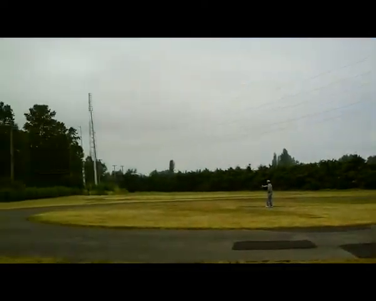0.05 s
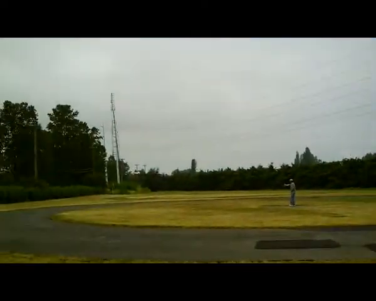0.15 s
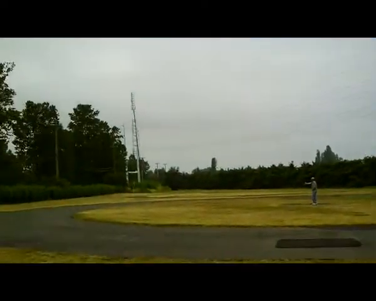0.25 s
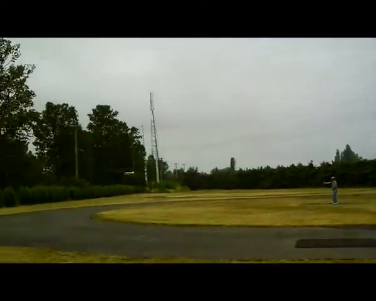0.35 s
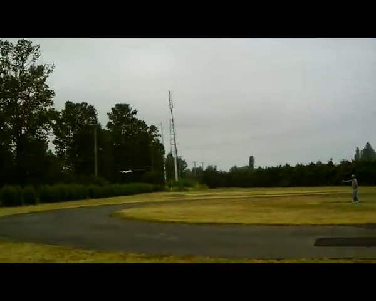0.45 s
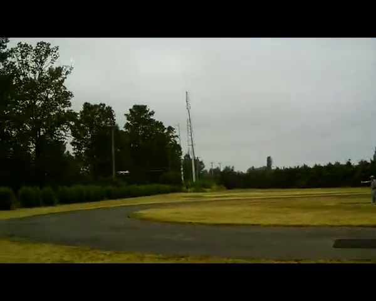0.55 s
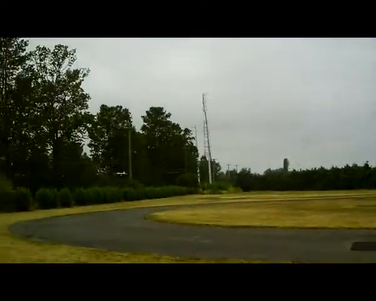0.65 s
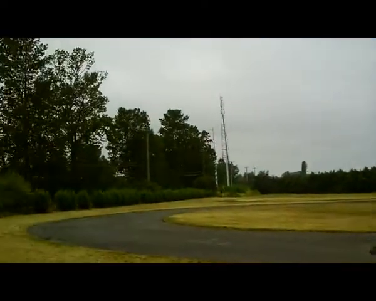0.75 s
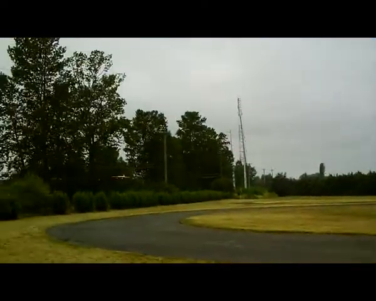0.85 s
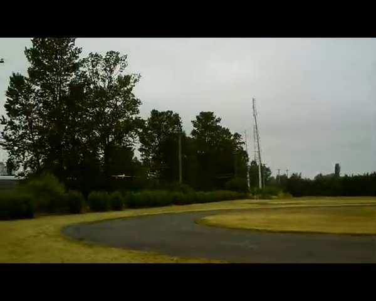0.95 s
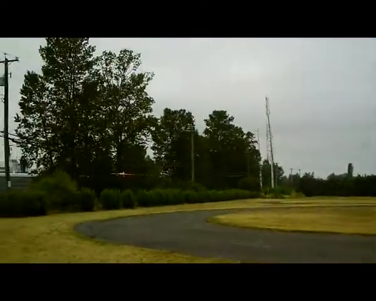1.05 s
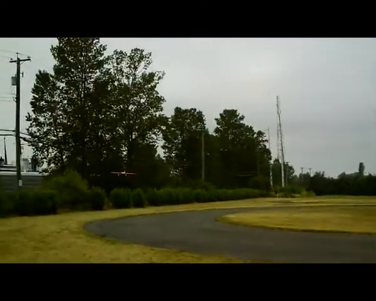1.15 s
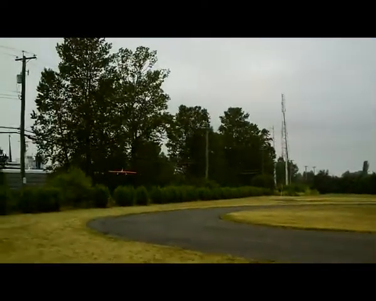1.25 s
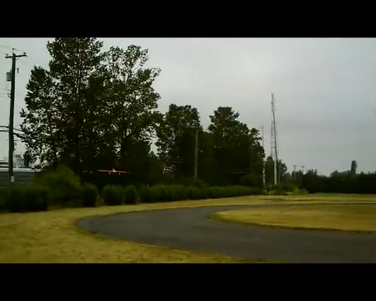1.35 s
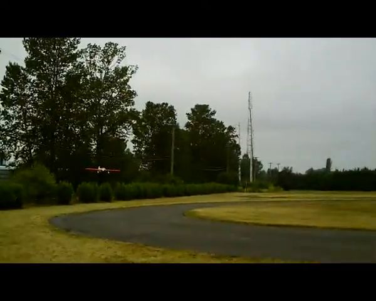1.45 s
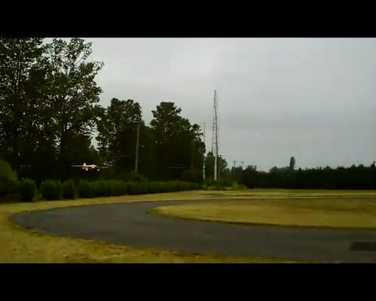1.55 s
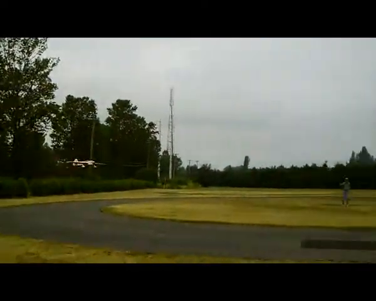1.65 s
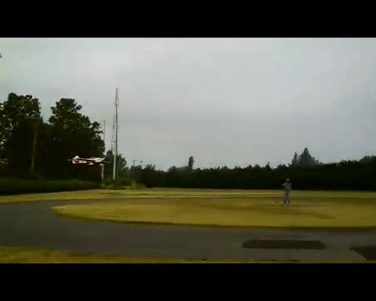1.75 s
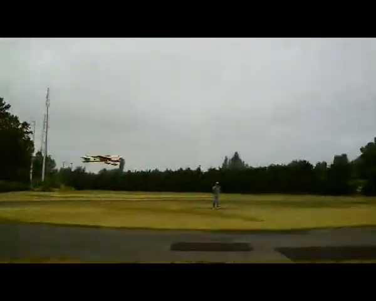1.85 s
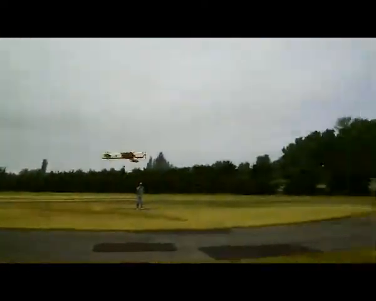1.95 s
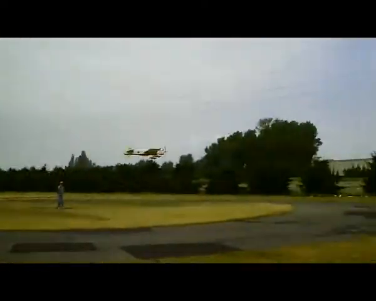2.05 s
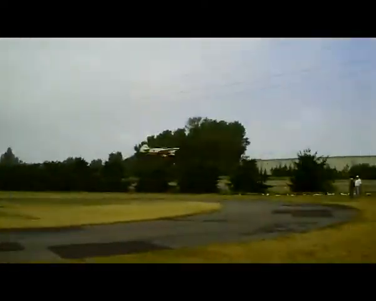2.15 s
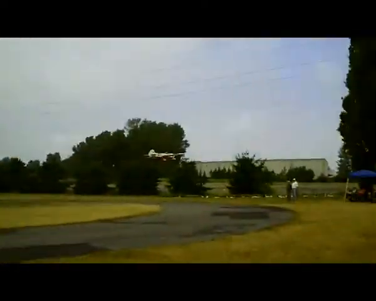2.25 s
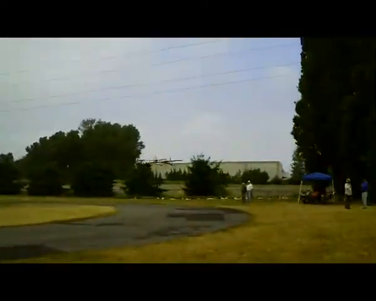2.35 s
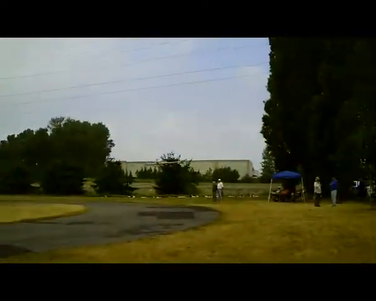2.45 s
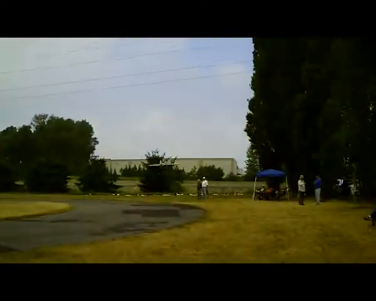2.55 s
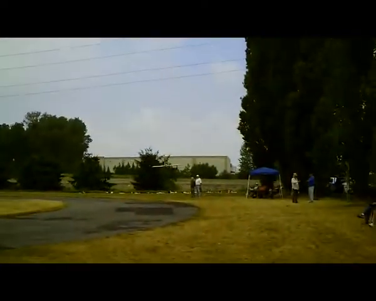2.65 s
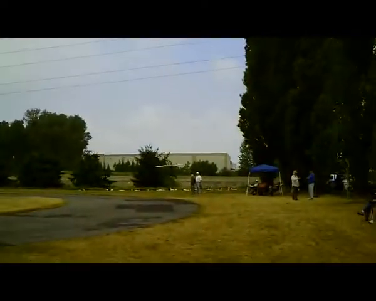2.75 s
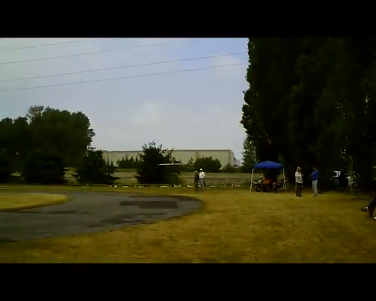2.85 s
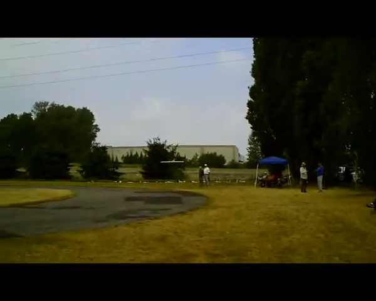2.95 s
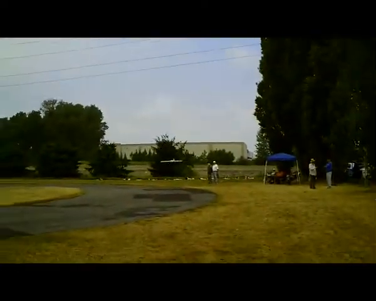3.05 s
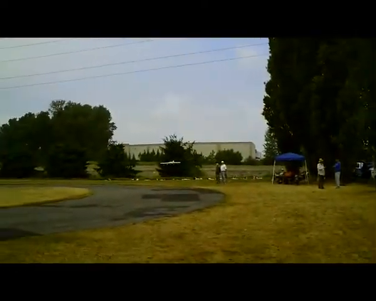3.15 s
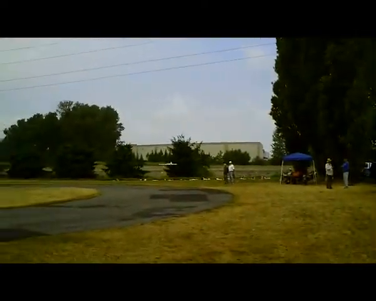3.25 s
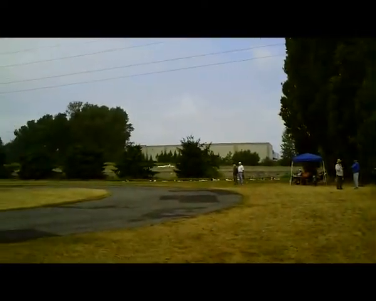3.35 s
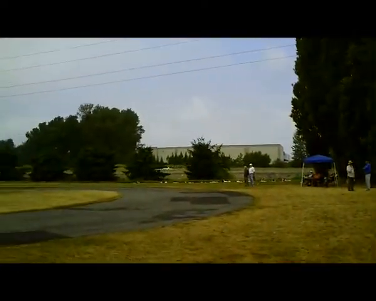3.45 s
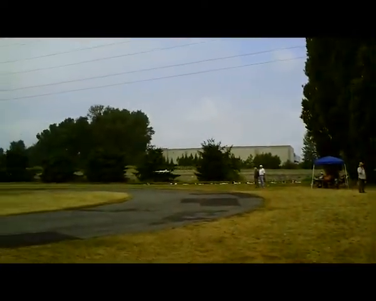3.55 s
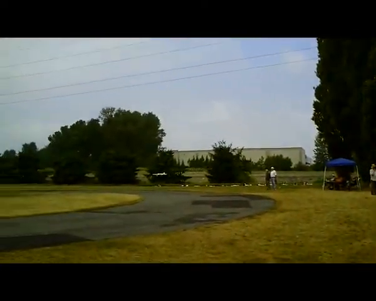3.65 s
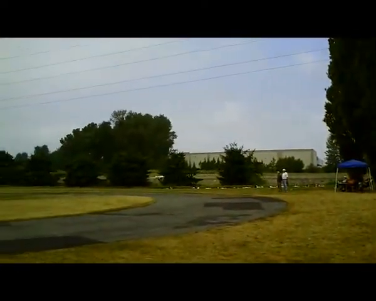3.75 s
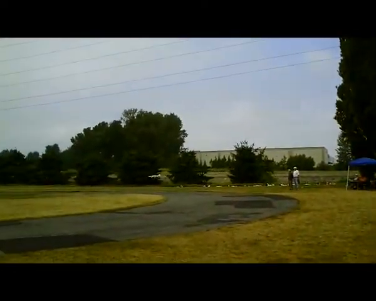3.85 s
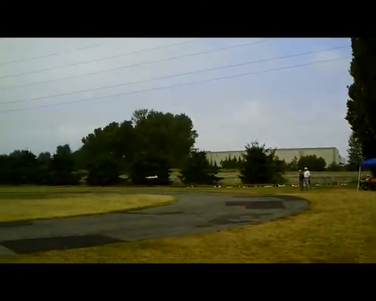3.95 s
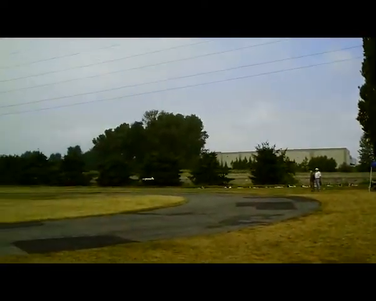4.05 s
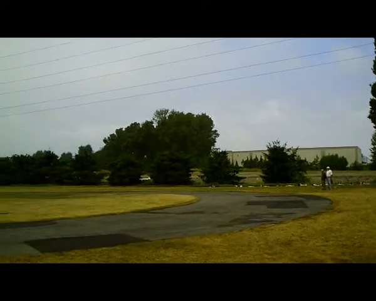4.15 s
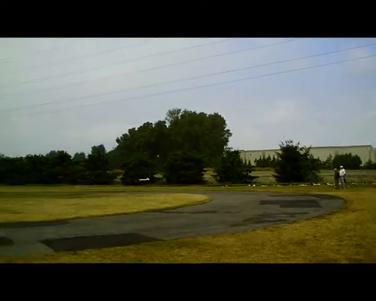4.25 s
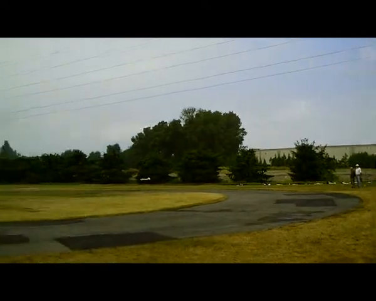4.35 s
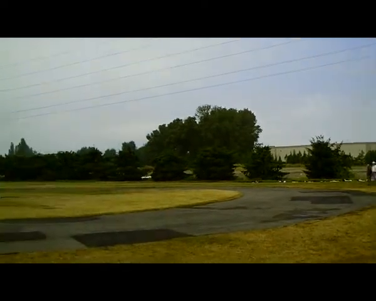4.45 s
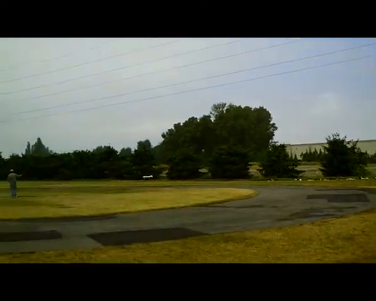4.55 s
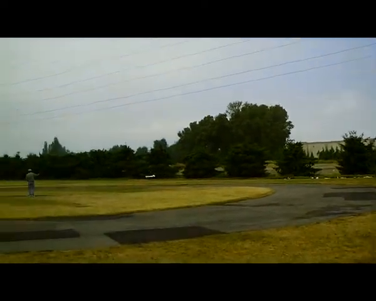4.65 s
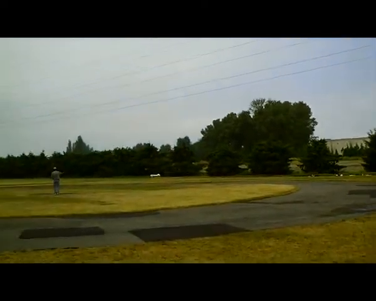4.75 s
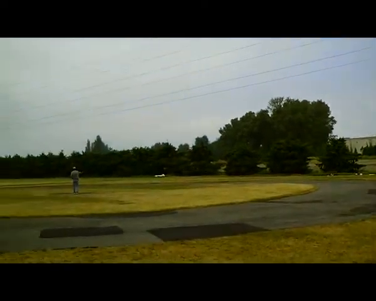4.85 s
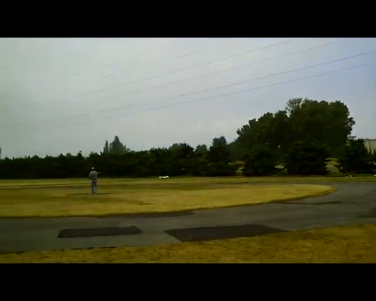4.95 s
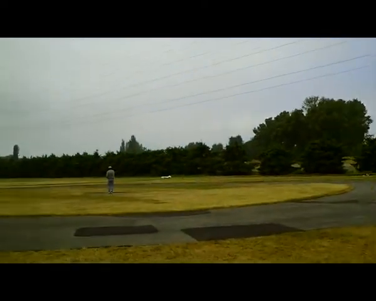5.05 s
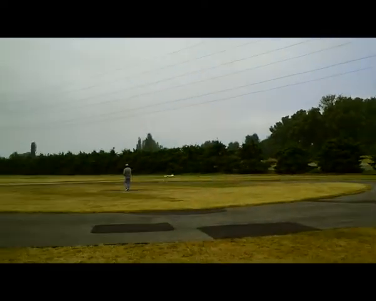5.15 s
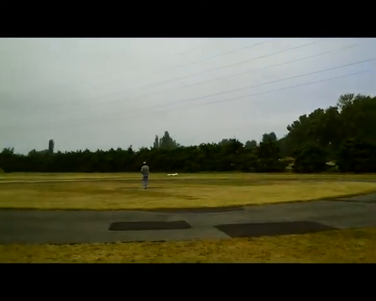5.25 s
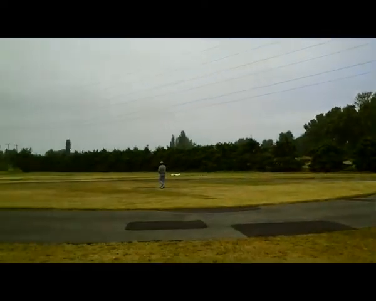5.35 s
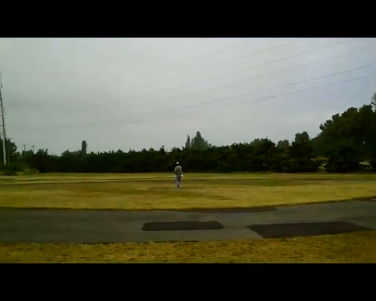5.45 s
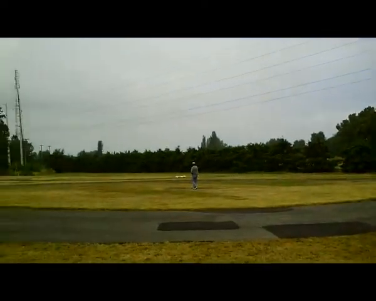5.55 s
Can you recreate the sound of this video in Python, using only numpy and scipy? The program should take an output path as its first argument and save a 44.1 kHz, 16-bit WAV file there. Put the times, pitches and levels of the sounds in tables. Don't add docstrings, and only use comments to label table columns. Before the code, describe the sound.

Open grass field with a low, steady rumble of distant traffic and wind. From 0 s a small four-stroke model plane approaches: a firm, nasal, raspy buzz around 80 pulses a second, with metallic clatter and bright propeller hiss. It edges up in pitch and swells, its timbre shifting as it turns, loudest around 1.5-1.8 s. At about 1.76 s the engine cuts at its nearest point; pitch falls quickly, with hollow barks and small stumbles, becoming a slowing putter near 40 a second by 2.7 s. It recedes and fades out around 3-3.4 s. A faint hollow blade tone and breathy air puffs linger to about 4.3 s. Small high chirps cluster at 3.2-3.8 s and again at 4.8-5.2 s. Fine metallic valve ticks, clearest at 4.3-4.8 s, gradually slow and vanish, leaving quiet rumble until 5.6 s. Faint echoes return from the hedge.

```python
import sys
import numpy as np
from scipy import signal
from scipy.fft import rfft, irfft
from scipy.io import wavfile
from scipy.ndimage import uniform_filter1d

SR = 44100
rng = np.random.default_rng(int(sys.argv[2]) if len(sys.argv) > 2 else 0)


def boost(x):
    u = np.asarray(x, float) / 20
    return 10 ** u


def waveform_to_disk(signal):
    frames = np.transpose(np.atleast_2d(signal))
    scaled = np.clip(frames, -1, 1) * 32767
    samples = np.round(scaled).astype(np.int16)
    wavfile.write(sys.argv[1], SR, samples)


N = 246959
FIRE_OUT_S, FIRE_FADE_S = 3.15, 0.3

# [t/s, engine cycles/s]
SPEED = [(0.0, 78.2), (0.33, 80.1), (0.79, 82.2), (1.18, 84.0), (1.58, 83.0), (1.68, 80.6), (1.735, 79.0),
         (1.765, 74.9), (1.8, 73.2), (2.01, 63.6), (2.1, 57.9), (2.32, 48.3), (2.43, 44.3), (2.66, 40.5),
         (2.95, 36.0), (5.6, 12.3)]
# [t/s, level/dB]
NEARNESS = [(0, -51), (.36, -50.5), (.85, -43.5), (1.06, -44.5), (1.51, -40), (1.8, -37.5), (2.01, -41.5),
            (2.3, -47.5), (2.55, -51), (2.9, -56.5), (3.3, -59.5), (3.98, -69), (4.4, -65), (4.95, -72.5),
            (5.6, -83)]
# [f/Hz, density/dB per Hz]
HISS = [(1650, -14.5), (2700, -2.5), (3240, -6.5), (4600, -6), (5770, -3.5), (7440, -2), (10200, -11.5),
        (11400, -20.5), (12200, -7), (13000, -12), (13700, -11.5), (14600, -17.5), (16000, -35)]


def rms_one(x):
    return x / np.sqrt(np.mean(x ** 2) + 1e-20)


def in_time(rows):
    s, *columns = np.transpose(rows)
    return [np.interp(np.arange(N) / SR, s, c) for c in columns]


def evened(x):
    return x / np.sqrt(uniform_filter1d(x ** 2, size=6000) + 1e-12)


def drift(rate_hz):
    knots_per_s = 60
    knots = rng.standard_normal(int(N / SR * knots_per_s) + 2)
    pole = np.exp(-2 * np.pi * min(rate_hz, 25) / knots_per_s)
    smooth = rms_one(signal.lfilter([1], [1, -pole], knots))
    return np.interp(np.arange(N) / SR * knots_per_s, np.arange(len(knots)), smooth)


def coloured(spectrum):
    hz, level_db = np.transpose(spectrum)
    grid_hz = np.arange(N // 2 + 1) * SR / N + 1
    gain = boost(np.interp(np.log(grid_hz), np.log(hz), level_db))
    return rms_one(irfft(rfft(rng.standard_normal(N)) * gain, N))


def resonate(x, modes):
    out = 0
    for hz, width_hz, level_db in modes:
        r = np.exp(-np.pi * width_hz / SR)
        poles = [1, -2 * r * np.cos(2 * np.pi * hz / SR), r * r]
        out = out + boost(level_db) * signal.lfilter([(1 - r * r) / 2, 0, (r * r - 1) / 2], poles, x)
    return out


def steep(x, hz, width_hz):
    return resonate(resonate(x, [(hz, width_hz, 0)]), [(hz, width_hz, 0)])


def pipe(x, modes, facing_db):
    return evened(sum(boost(level_db + side * facing_db) * steep(x, hz, width_hz)
                      for hz, width_hz, level_db, side in modes))


def window(start_s, end_s, edge_s):
    t = np.arange(N) / SR
    return np.clip(np.minimum(t - start_s, end_s - t) / edge_s + .5, 0, 1)


def facing(at_s, for_s):
    return np.exp(-((np.arange(N) / SR - at_s) / for_s) ** 2)


def fire():
    return np.clip(1 - (np.arange(N) / SR - FIRE_OUT_S) / FIRE_FADE_S, 0, 1)


def cycles(per_s, at_s):
    turns = np.cumsum(per_s) / SR
    return turns - turns[int(at_s * SR)] + 400


def clicks(turns, spread_db):
    whole = np.floor(turns).astype(int)
    strength = boost(spread_db * rng.standard_normal(800))
    return (np.diff(whole, prepend=whole[0]) > 0) * strength[whole]


def stroke(noisy, beats, flow):
    return np.sqrt(1 - noisy) * beats + np.sqrt(noisy) * flow


def field():
    # [f/Hz, density/dB per Hz]
    rumble = [(15, -49), (25, -1.5), (110, -4.5), (150, -11.5), (230, -15.5), (290, -23), (550, -26),
              (800, -17), (1050, -20.5), (1250, -26), (2500, -29.5), (2850, -42.5), (7700, -47.5),
              (12000, -69)]
    whine = rms_one(steep(rng.standard_normal(N), 7590, 60))
    return boost(-40.5 + 0.28 * drift(0.69)) * coloured(rumble) + boost(-81) * whine


def birds():
    # [t/s, start f/Hz, level/dB]
    chirps_up = [
        (3.235, 6940, -65),
        (3.355, 6830, -57),
        (3.485, 7000, -60),
        (3.59, 7300, -61),
        (3.71, 6900, -66),
        (4.81, 7000, -61),
    ]
    # [t/s, length/s, f/Hz, level/dB]
    twitter = [(3.402, 0.033, 7170, -59), (4.927, 0.022, 7700, -65), (5.0, 0.027, 6260, -62),
               (5.023, 0.03, 6830, -57), (5.055, .018, 6620, -57), (5.112, 0.011, 6950, -64),
               (5.133, 0.028, 5430, -64), (5.183, 0.031, 5420, -62), (5.13, .012, 5200, -65),
               (5.045, .015, 5320, -64), (3.442, .025, 7130, -59), (3.6, 0.0123, 7100, -58),
               (3.325, .015, 7000, -57)]
    up_s, up_hz = .041, 697
    out = np.zeros(N)
    notes = [(s, up_s, hz, hz + up_hz, level_db) for s, hz, level_db in chirps_up]
    notes += [(s, length_s, hz, hz, level_db) for s, length_s, hz, level_db in twitter]
    for s, length_s, start_hz, end_hz, level_db in notes:
        t = np.arange(int(length_s * SR)) / SR
        pitch_hz = start_hz + (end_hz - start_hz) * t / length_s + 70.0 * np.sin(2 * np.pi * 83.0 * t)
        note = np.hanning(len(t)) ** .5 * np.sin(2 * np.pi * np.cumsum(pitch_hz) / SR)
        out[int(s * SR):int(s * SR) + len(t)] += boost(level_db) * note
    echoes = [(0.011, 0.48), (0.027, 0.3), (0.059, 0.25)]   # (lag s, gain)
    return out + sum(gain * np.roll(out, int(lag_s * SR)) for lag_s, gain in echoes)


def blade_tone():
    speed = in_time(SPEED)[0]
    turns = cycles(speed, 4.5275)
    fuselage_hz, width_hz, level_db = 286, 40, -55
    tone = 0
    for k in range(7, 13):
        passing = np.exp(-((k * speed - fuselage_hz) / width_hz) ** 2)
        tone = tone + boost(level_db + 1.7 * drift(3.6)) * passing * np.sin(2 * np.pi * k * turns)
    return window(2.82, 3.92, 0.15) * tone


def wing_gusts():
    # [f/Hz, width/Hz, level/dB, at t/s, for/s]
    gusts = [
        (1490, 190, -58, 3.95, .06),
        (2960, 390, -65.5, 4.25, 0.11),
        (2200, 770, -64.5, 3.7, 0.092),
        (3970, 2300, -60, 3.0, 0.17),
    ]
    air = rng.standard_normal(N)
    return sum(boost(level_db) * facing(at_s, for_s) * rms_one(resonate(air, [(hz, width_hz, 0)]))
               for hz, width_hz, level_db, at_s, for_s in gusts)


def tappet(turns):
    # [level/dB, facing at t/s, for/s]
    tappet_heard = [
        (-58, 3.68, .12),
        (-61, 3.6, .03),
        (-61, 4.41, .08),
    ]
    level = sum(boost(level_db) * facing(at_s, for_s) for level_db, at_s, for_s in tappet_heard)
    knock = np.diff(np.floor(turns), prepend=turns[0] // 1)
    return level * 70 * resonate(knock, [(5430, 200, 0)])


def valve_ticks(turns):
    # [share of cycle, level/dB]
    valves = [
        (0.0, 0.5),
        (.27, -1.5),
        (.52, -14),
        (.76, -17),
    ]
    # [f/Hz, width/Hz, level/dB]
    valve_gear = [(4200, 300, 10), (5890, 620, 6), (6550, 900, 0), (7270, 770, -8), (8250, 770, -9)]
    # [t/s, peak level/dB]
    ticks = [(4.3097, -52), (4.3516, -49), (4.394, -46), (4.4374, -46), (4.4793, -53), (4.5277, -47),
             (4.5736, -49), (4.621, -46.5), (4.6699, -49), (4.7198, -48.5), (4.771, -46.5), (4.818, -53)]
    t, side_on_s, side_off_s = np.arange(N) / SR, 4.28, 4.83
    tick_db = -60 - 12 * window(side_on_s, side_off_s, .15) - 45 * np.maximum(t - side_off_s, 0)
    single = np.zeros(N)
    tick_s, peak_db = np.transpose(ticks)
    single[(tick_s * SR).astype(int)] = boost(peak_db - 7.0)
    single = single + boost(-4.5) * np.roll(single, int(.012 * SR))
    single = signal.lfilter([1], [1, -.99], single)
    contacts = sum(boost(level_db) * clicks(turns - share, spread_db=1.2) for share, level_db in valves)
    burst = signal.lfilter([1], [1, -.985], contacts)
    metal = rms_one(resonate(rng.standard_normal(N), valve_gear)) + 1.27 * coloured(HISS)
    bright = signal.sosfilt(signal.butter(4, 5000, "high", fs=SR, output="sos"), metal)
    return boost(tick_db) * burst * metal + single * bright


def glide():
    air_db, turns = in_time(NEARNESS)[0], cycles(in_time(SPEED)[0], 4.5275)
    airflow = boost(air_db + 1.0 * drift(6.9)) * coloured(HISS)
    fire_out = np.sqrt(1 - fire() ** 2)
    return tappet(turns) + fire_out * (valve_ticks(turns) + airflow) + blade_tone() + wing_gusts()


def air_hiss(turns, later):
    # [f/Hz, width/Hz, level/dB, facing at t/s, for/s]
    panels = [(6100, 400, 3.5, 0.23, 0.37), (7960, 830, -3.5, .1, 0.33), (6420, 390, 7.5, 0.73, 0.28),
              (6900, 130, 3, 0.63, 0.093), (4125, 270, 0, 0.71, 1), (5960, 220, -3, 0.89, 0.18),
              (7160, 410, 2, 0.96, 0.57), (6510, 340, 0, 1.66, 0.55), (8440, 370, 0, 1.6, 1),
              (9300, 620, -5.5, 1.9, 0.74), (7550, 170, 3, 1.75, 0.31), (5940, 270, 0.5, 1.96, 0.16),
              (6250, 420, 3.5, 2.16, .15), (7100, 230, -3.5, 1.8, 0.69)]
    puff_at, second_puff_at = .09, 0.31
    puffs = (1 - 0.52 * later) * np.exp(-4.0 * ((turns - puff_at) % 1))
    puffs = puffs + 0.41 * later * np.exp(-4.0 * ((turns - second_puff_at) % 1))
    luck = rng.standard_normal(800)
    swell = 0.82 + puffs * boost(1.8 * luck)[(turns - puff_at).astype(int)]
    stall = np.exp(-((turns % 1 - 0.884) / 0.067) ** 2)
    lull = boost(-6.5 * np.abs(luck[::-1])[turns.astype(int)] * stall)
    knocks = swell ** 2.4 * rng.standard_normal(N)
    clatter = rms_one(sum(facing(at_s, for_s) * resonate(knocks, [mode]) for *mode, at_s, for_s in panels))
    hiss = rms_one(swell * coloured(HISS)) + 0.52 * boost(1.0 * drift(4.6)) * clatter
    hiss = evened(lull * hiss) * boost(0.95 * drift(16.0))
    top = signal.sosfiltfilt(signal.butter(4, 11300, "high", fs=SR, output="sos"), hiss)
    return hiss - .35 * window(2.3, 9, 0.55) * top


def intake(turns, noisy, later, later_at):
    # [f/Hz, width/Hz, level/dB, side it faces]
    throat = [
        (2138, 195, 1, 0),
        (2284, 285, 3.5, 0),
    ]
    first_at = 0.1004
    gulps = np.sqrt(1 - later) * evened(clicks(turns - first_at, spread_db=1.5))
    gulps = gulps + np.sqrt(later) * evened(clicks(turns - later_at, spread_db=-1.5))
    flow = 0.4 + (1 - later) * np.exp(-6.0 * ((turns - first_at) % 1))
    flow = flow + later * np.exp(-6.0 * ((turns - later_at + 0.11) % 1))
    suck = evened(flow * rng.standard_normal(N))
    return pipe(stroke(noisy, gulps, suck), throat, 0)


def cowl_openings(clean):
    # [f/Hz, width/Hz, level/dB, facing at t/s, for/s]
    cowl = [(497, 69, -52.5, 0.65, 0.28), (606, 59, -50, 0.9, 0.24), (1410, 81, -49, 1.12, 0.16),
            (1696, 110, -47, 1.59, 0.2), (914, 66, -40, 1.9, 0.053), (1360, 250, -44.5, 1.8, 0.08),
            (1062, 125, -41.5, 1.96, 0.12), (417, 240, -73, 2.5, 0.076), (2840, 67, -64, 2.16, 0.26),
            (1350, 190, -50.5, 0.27, 0.32), (616, 92, -47, 2.125, 0.19), (322.6, 110, -47.5, 2.084, 0.17),
            (241, 50, -49.5, 1.56, 0.37), (433, 23, -47.5, 0.96, 0.19), (536, 120, -54.5, 2.49, 0.14),
            (395, 39, -51, 0.093, 0.2), (810, 68, -49, 2.7, 0.074), (800, 130, -46, 2.44, 0.063),
            (2800, 270, -57, 2.47, 0.057)]
    return sum(boost(level_db) * facing(at_s, for_s) * pipe(clean, [(hz, width_hz, 0, 0)], 0)
               for hz, width_hz, level_db, at_s, for_s in cowl)


def exhaust_thump(strokes):
    # [f/Hz, width/Hz, level/dB]
    thump_modes = [
        (150, 53, 1),
        (270.5, 84, 7.5),
        (402, 38, 6.5),
    ]
    # [t/s, lag/ms]
    ground_echo = [(0, .82), (.75, .78), (1.0, .9), (1.2, 1.0), (1.5, 1.1), (1.76, 1.75), (2.0, 2.1),
                   (2.4, 2.15), (2.7, 1.2)]
    echo_ms = in_time(ground_echo)[0]
    thump = resonate(strokes, thump_modes)
    thump = signal.sosfilt(signal.butter(3, 600, fs=SR, output="sos"), thump)
    return evened(thump + .7 * np.interp(np.arange(N) - echo_ms * SR / 1000, np.arange(N), thump))


def silencer_bark(turns, pulses, gas, noisy, facing_db):
    # [t/s, strength re pulse, lead/cycles]
    blow_down = [(0, 0.16, .3), (.6, 0.33, 0.34), (1.0, 0.59, 0.34), (1.4, 0.35, 0.32), (1.62, 0.27, 0.37),
                 (1.75, 0.66, 0.34), (1.9, 0.65, 0.364), (2.2, 2.4, 0.288), (2.42, 4.3, 0.099),
                 (3.2, 8.2, 0.097)]
    # [f/Hz, width/Hz, level/dB, side it faces]
    silencer = [
        (770, 120, 0, -1),
        (845, 140, -1, 1),
        (985, 200, -9, 0),
    ]
    early, lead = in_time(blow_down)
    doubled = evened(pulses + early * evened(clicks(turns + lead, spread_db=1.3)))
    return pipe(stroke(noisy, doubled, gas), silencer, facing_db)


def exhaust_rasp(strokes, facing_db):
    # [f/Hz, width/Hz, level/dB, side it faces]
    rasp_modes = [
        (1166, 38, 4, -0.32),
        (1402, 295, 1.5, 0.59),
        (1664, 33, -2.5, -0.93),
    ]
    return pipe(strokes, rasp_modes, facing_db)


def beating(tone, turns):
    # [multiple of cycle, change/dB, at t/s, for/s]
    beats = [(2, 8, 1.98, 0.064), (2, 9.5, 2.23, .18), (3, 9, 1.84, .04), (3, 11, 2.13, 0.13),
             (4, -8, 2.05, .16), (4, 10, 2.2, .05), (4, 2.5, 0.11, 0.12), (5, 4, .08, .1),
             (5, -6.5, 1.49, 0.103), (5, 7.5, 1.84, .07), (5, 8, 2.38, 0.055), (6, 4.5, 0.13, 0.24),
             (6, -7, 1.2, 0.26), (6, -8.5, 2.24, 0.2), (7, -15, .08, 0.11), (7, -11, 1.76, 0.066),
             (8, 5, .38, 0.12), (8, 8, 1.12, .12), (8, 4.5, 1.55, 0.11), (8, -15, 1.845, 0.075),
             (8, 11, 2.4, 0.071), (9, -12, 0.074, 0.17), (9, 10, 1.895, .09), (10, 7, 1.68, 0.061),
             (10, -8, 1.77, .03), (10, 16.5, 1.95, 0.068), (11, -11, 0.74, 0.21), (11, 10, 2.02, 0.045),
             (12, -7, 0.18, .06), (12, -9, 0.8, .14), (12, -9, 1.8, .03), (12, 5, 1.88, .03),
             (12, -9, 1.98, 0.051), (12, 10, 2.3, .04), (13, 13, 1.08, 0.11), (13, -13, 1.44, 0.08),
             (13, -8, 1.75, .14), (13, 5, 2, 0.025), (14, -10, 0.84, 0.09), (14, -15, 1.68, 0.2),
             (14, 11, 2.08, .03), (15, -5, 1.12, 0.091), (15, -10, 1.48, 0.062), (16, 4, 0.9, .08),
             (17, 8, 1.56, .07), (18, -5, 1.2, 0.19), (18, 8, 1.55, .07), (19, 4, 1.33, 0.15)]
    # [multiple of cycle, change/dB, at t/s, for/s]
    more_beats = [(2, 10, 2.3, .12), (3, 8, 2.23, .05), (3, 1.5, 1.05, 0.45), (2, 3, 2.12, .05),
                  (15, 8, 2.46, .04), (14, 4, 2.67, .1), (6, -5.5, 1.92, 0.043), (6, 7, 2.04, 0.033),
                  (6, 7, 2.16, .03), (7, -3, 2.01, .05), (8, -10, 1.9, .03), (9, 6, 2.16, .03),
                  (10, -5, 2.11, 0.076), (10, -3, 1.46, .07), (11, 8, 2.04, .03), (11, -4, 1, .12),
                  (11, -7, 1.68, .03), (12, 13, 1.72, .04), (12, -8, .5, .07), (12, 5, 2.28, 0.033),
                  (13, -4, .2, .18), (13, -10, 1.7, .03), (13, 12.5, 1.93, .04), (13, 8, 2.28, .03),
                  (14, -7, 1.9, .05), (14, 13, 2.38, .04), (15, 7, 1.62, .03), (15, -8, 1.89, .05),
                  (15, -7, 2.2, .04), (15, 10, 2.16, .03), (15, -1, 2.26, .04), (16, 8, 1.63, 0.045),
                  (16, -14, 1.77, .04), (16, -5, 1.95, .03), (16, 7, 2.1, 0.033), (16, -8, 2.38, 0.046),
                  (18, -9, 1.59, .03), (18, -8, 2.02, 0.036), (18, 12, 2.1, .03), (20, 9, 1.68, .03),
                  (21, 7, 1.96, 0.045), (21, 8, 2.22, 0.027)]
    # [t/s, level/dB, for/s]
    stumbles = [
        (1.932, -3.5, 0.0088),
        (2.01, -4, 0.011),
        (2.505, -2, 0.013),
    ]
    out, rows = tone.copy(), beats + more_beats
    for k in {round(row[0]) for row in rows}:
        spin = np.exp(2j * np.pi * k * turns)
        slow = [uniform_filter1d(uniform_filter1d(tone * part, size=640), size=800)
                for part in (spin.real, spin.imag)]
        change_db = sum(level_db * facing(at_s, for_s)
                        for multiple, level_db, at_s, for_s in rows if round(multiple) == k)
        out += (boost(change_db) - 1) * 2 * (slow[0] * spin.real + slow[1] * spin.imag)
    return out * boost(sum(level_db * facing(at_s, for_s) for at_s, level_db, for_s in stumbles))


def engine():
    # [t/s, level/dB, share of later gulp, its place/cycles]
    intake_heard = [(0, -69, 0.35, 0.44), (.5, -52, 0.35, 0.42), (1.0, -48, 0.63, 0.48),
                    (1.25, -43.5, 0.73, 0.54), (1.55, -48, 0.4, 0.56), (1.85, -40.5, 0.92, 0.42),
                    (2.25, -48, 1, 0.48), (2.6, -53.5, 0.77, 0.69), (3.2, -58, 0.68, 0.69)]
    t, cut_s = np.arange(N) / SR, 1.76
    hiss_db, speed = in_time(NEARNESS)[0], in_time(SPEED)[0]
    intake_db, later, later_at = in_time(intake_heard)
    later = np.clip(later, 0, 1)

    nose_db, tail_db = 4, -3
    stub_facing_db = np.interp(t, [0, 1.82], [nose_db, tail_db])
    wing_shadow, tail_shadow = facing(0.94, 0.35), facing(2.12, 0.11)
    up_the_pipe = window(2.43, 9, 0.096)
    silencer_facing_db = 0.53 * stub_facing_db + 19 * wing_shadow + 2 * up_the_pipe
    away_db = hiss_db + 38
    bark_db = -32.5 + away_db + 0.93 * (stub_facing_db - tail_db) - 8 * wing_shadow - 2.5 * tail_shadow
    thump_db = -35.5 + 1.09 * away_db + 6 * np.log2(speed / speed.max())
    rasp_db = -45.5 + 0.83 * away_db

    rasp_noise = np.interp(t, [0, cut_s, FIRE_OUT_S], [.12, .65, .9])
    low_noise = .045 + .055 * window(cut_s, cut_s + .5, .2)

    turns = cycles(speed, 1.1535)
    pulses = evened(clicks(turns, spread_db=-0.5))
    gas = evened((5.4 + np.exp(-3.0 * (turns % 1))) * rng.standard_normal(N))

    tone = boost(thump_db) * exhaust_thump(stroke(low_noise / 2, pulses, gas))
    tone = tone + boost(bark_db) * silencer_bark(turns, pulses, gas, low_noise, silencer_facing_db)
    tone = tone + boost(rasp_db) * exhaust_rasp(stroke(rasp_noise, pulses, gas), stub_facing_db)
    tone = tone + boost(intake_db) * intake(turns, rasp_noise, later, later_at)
    dip_share = 0.09 + 0.34 * window(-1, 2.16, 0.13)
    tone = tone - dip_share * resonate(tone, [(635, 120, 0)])
    tone = tone + cowl_openings(stroke(2 * low_noise, pulses, gas))
    tone = tone + .17 * np.roll(tone, int(.0425 * SR)) + .1 * np.roll(tone, int(.0910 * SR))
    return fire() * (beating(tone, turns) + boost(hiss_db) * air_hiss(turns, later))


def scene():
    return np.tile(field() + birds() + glide() + engine(), (2, 1))


def thinned(x):
    # [from f/Hz, to f/Hz, least rms level/dB, scatter/dB]
    kept = [(9800, 10500, -84, 2), (10500, 11200, -73, 5), (11200, 11650, -68, 6), (11650, 12150, -69, 4),
            (12150, 12700, -68.5, 1), (12700, 13300, -65.5, 1.2), (13300, 13900, -61.5, .8),
            (13900, 14700, -59.6, .3), (14700, 22050, -20, 0)]
    hz, _, frames = signal.stft(x, SR, nperseg=1024)
    for low_hz, high_hz, least_db, scatter_db in kept:
        band = (hz >= low_hz) & (hz < high_hz)
        power = uniform_filter1d(np.sum(np.abs(frames[band]) ** 2, axis=0), size=3) * 4 / 3
        luck = np.repeat(rng.standard_normal(len(power)), 2)[:len(power)]
        frames[band] *= power > boost(2 * (least_db + scatter_db * luck))
    return signal.istft(frames, SR, nperseg=1024)[1][:N]


def unevenness(x):
    hz, _, frames = signal.stft(x, SR, nperseg=2048)
    edges_hz = [340, 690, 1400, 1900, 2700, 3400, 4200, 5200, 6200, 7000, 7800, 8300, 9200, 10200,
                11000, 12000, 13000]
    band, index = np.searchsorted(edges_hz, hz), np.arange(18)
    chance = np.where(index == 4, .2, .07) * np.clip(index / 4, 0, 1) ** 2
    shape = (18, frames.shape[1])
    tiles = (rng.random(shape) < chance[:, None]) * rng.choice([-1, 1], shape)
    return boost(-13) * signal.istft(frames * tiles[band], SR, nperseg=2048)[1][:N]


def low_pass(x):
    return signal.sosfilt(signal.butter(12, 14700, fs=SR, output="sos"), x)


def record(dry):
    mid = thinned(dry[0])
    mix = mid + unevenness(mid) * np.array([[1], [-1]])
    return low_pass(mix)


dry = scene()
out = record(dry)
waveform_to_disk(out)
```